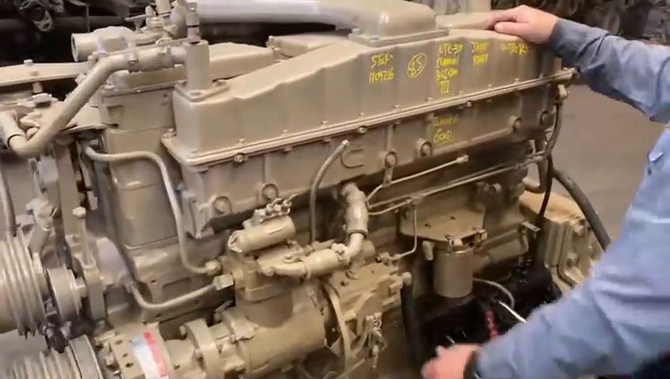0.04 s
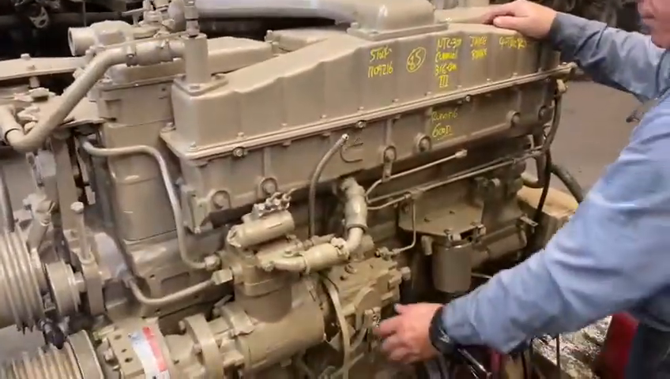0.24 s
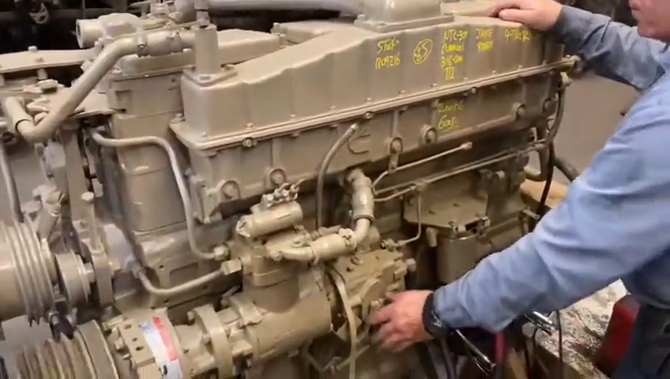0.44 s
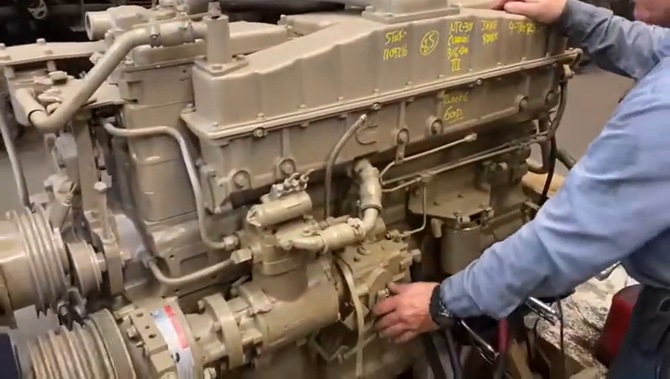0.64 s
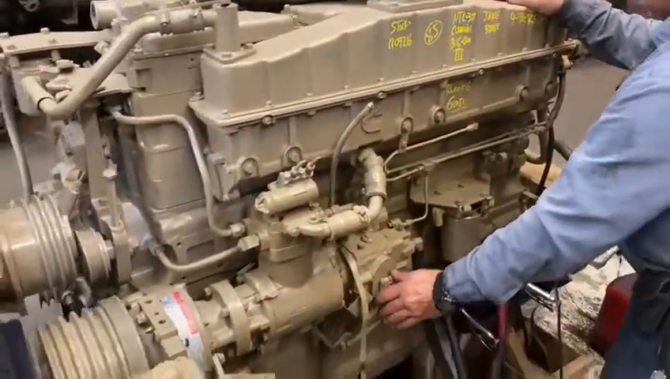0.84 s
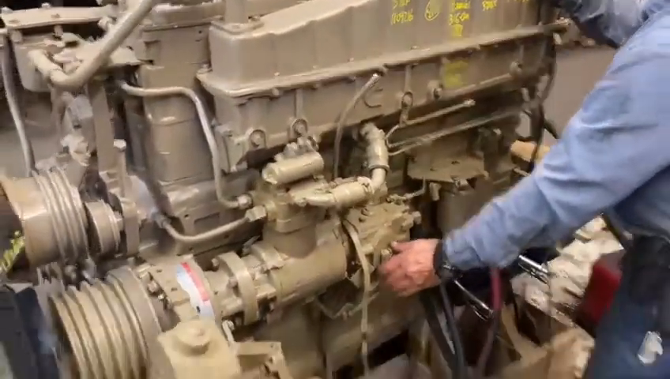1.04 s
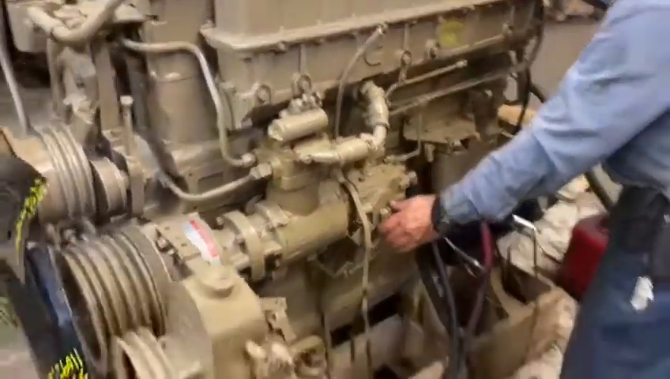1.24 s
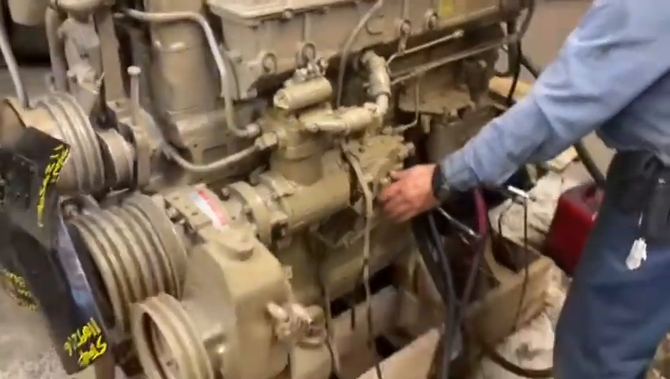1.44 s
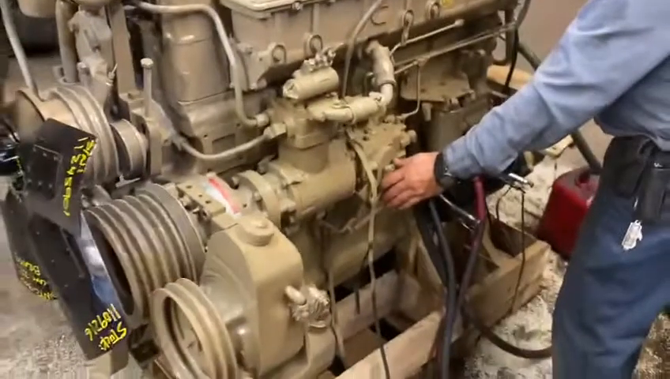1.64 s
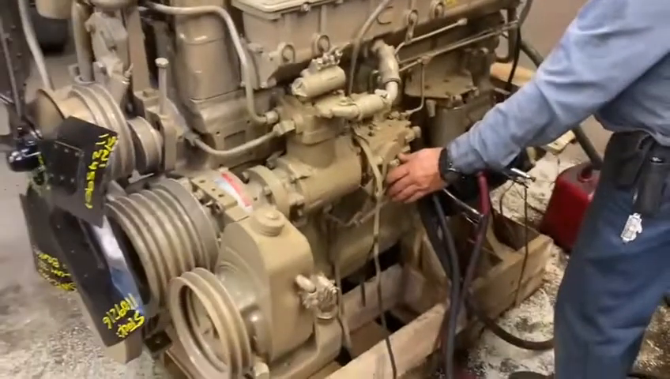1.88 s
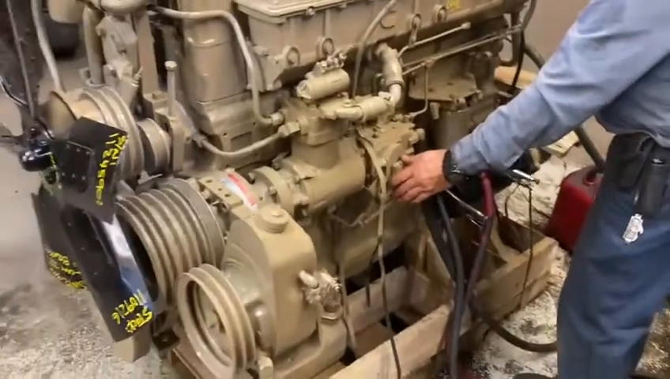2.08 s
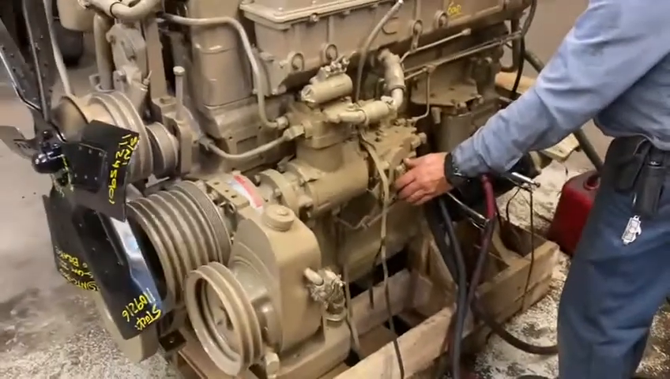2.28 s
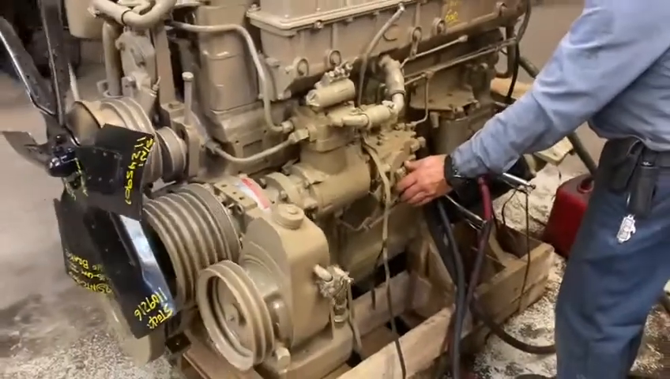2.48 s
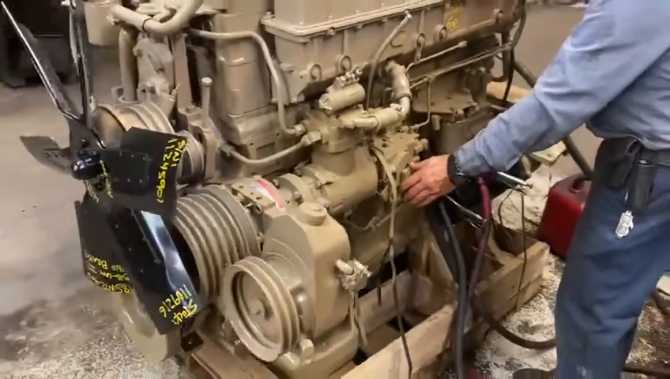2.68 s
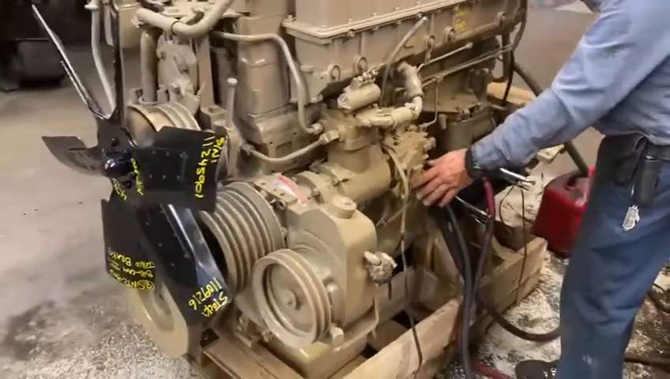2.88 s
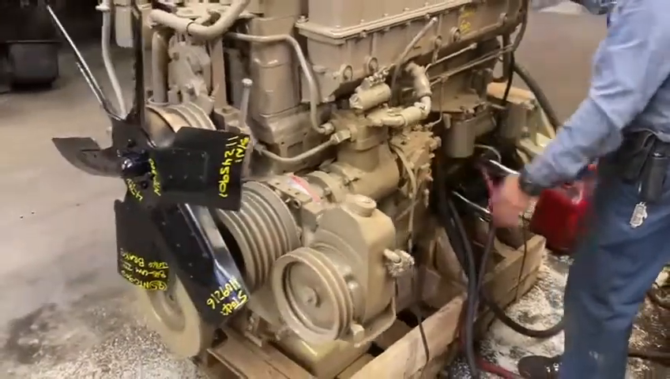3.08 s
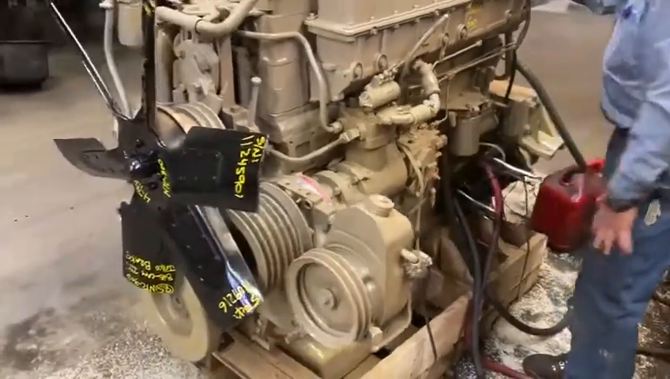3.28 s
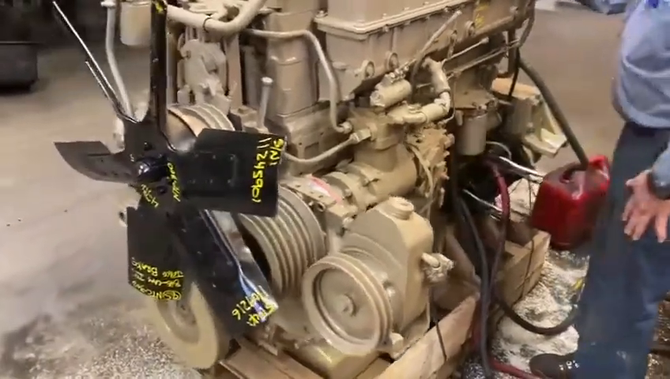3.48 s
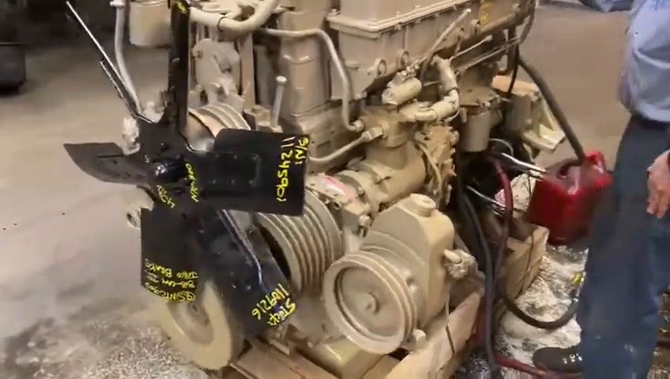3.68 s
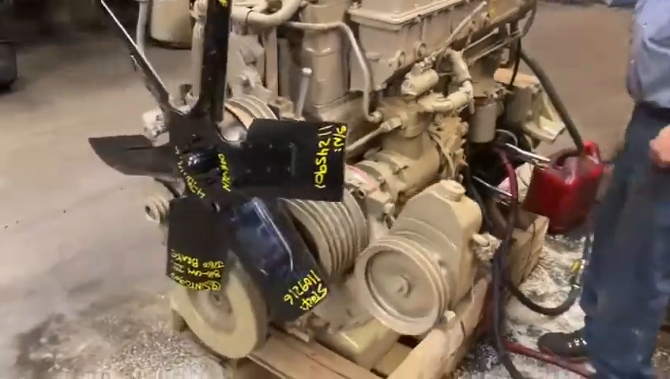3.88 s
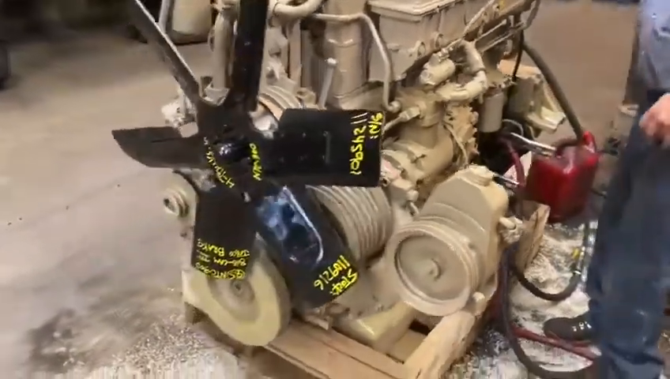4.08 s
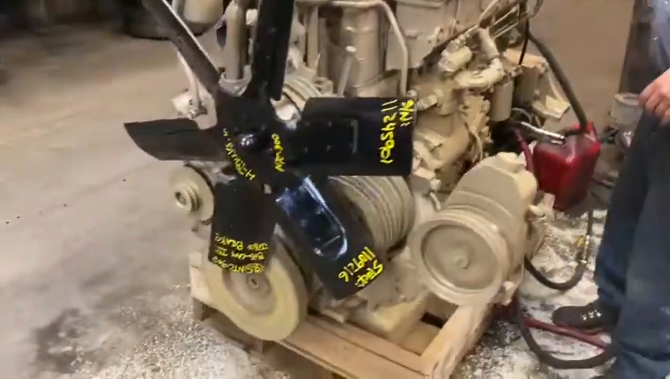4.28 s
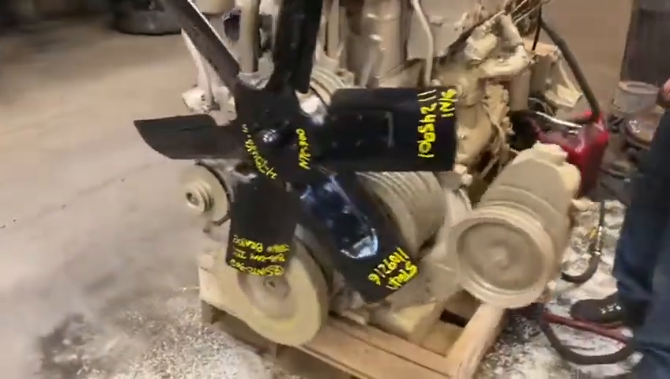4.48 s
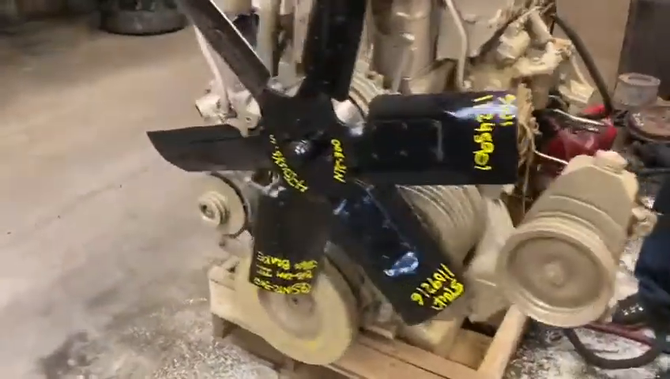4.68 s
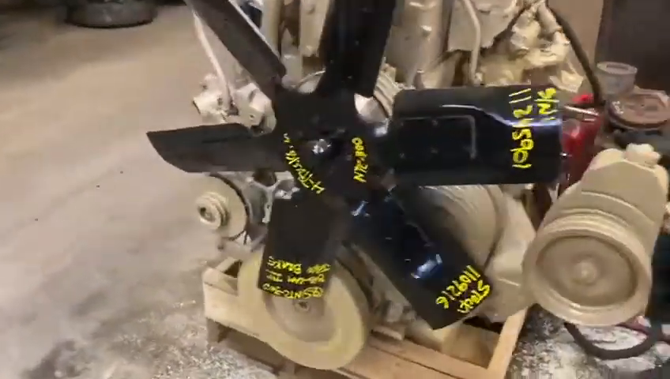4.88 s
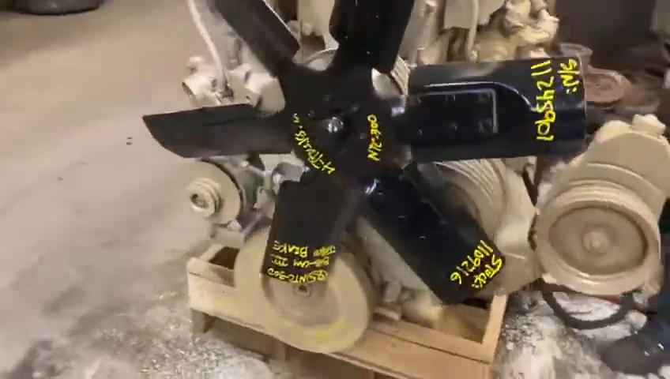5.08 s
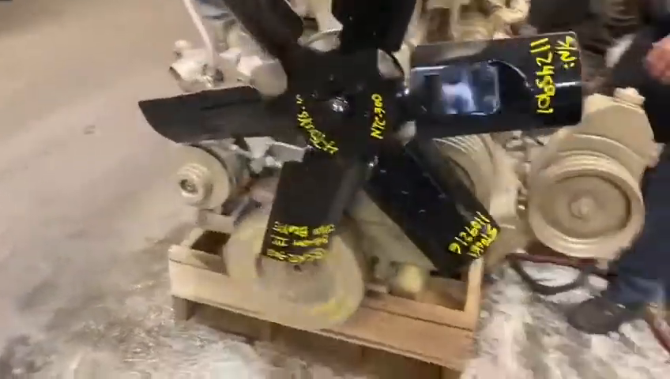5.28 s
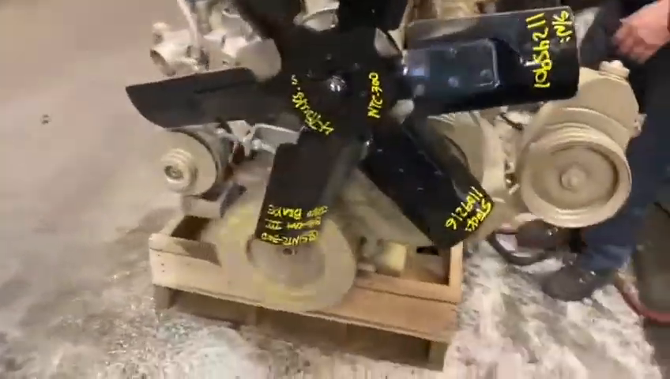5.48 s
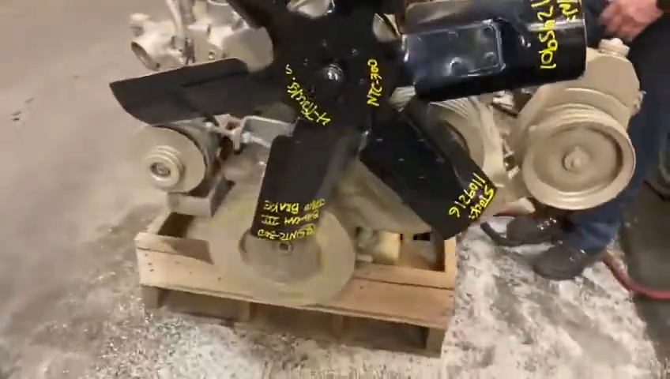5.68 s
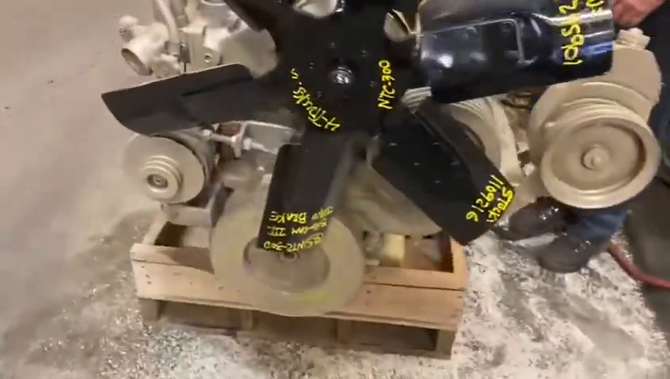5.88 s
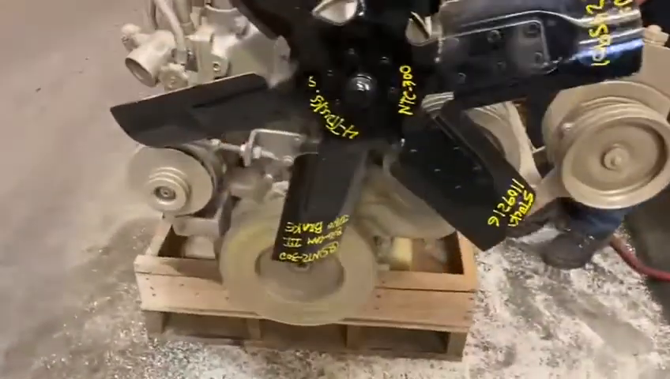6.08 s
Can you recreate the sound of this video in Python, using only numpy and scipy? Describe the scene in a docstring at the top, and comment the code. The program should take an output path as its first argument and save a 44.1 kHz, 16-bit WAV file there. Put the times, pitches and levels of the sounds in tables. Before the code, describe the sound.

Close beside a clattering six-cylinder diesel: puffing idle, two booming hand revs, whistling turbo, a knocking slowdown below idle, then a hard recovery.

```python
"""Air puffs once a revolution over the knock and exhaust rumble of an idling six-cylinder turbo diesel.
The engine stands bare on a pallet in a workshop; its compressor blows into the open, close by.
Two revs by hand bring exhaust boom, hard clatter and a rising turbo whistle; it coasts below idle, gears
knocking, until the governor's fuel catches it. Crank-timed bursts of coloured noise make the blows and
puffs, sines the exhaust tones, randomly modulated carriers the whistle."""
import sys
import numpy as np
from scipy import signal
from scipy.fft import rfft, irfft, next_fast_len
from scipy.io import wavfile
from scipy.ndimage import uniform_filter1d, map_coordinates

SR = 44100
rng = np.random.default_rng(int(sys.argv[2]) if len(sys.argv) > 2 else 0)


def generate_wav(sig):
    """Save sig (samples, or channels by samples) to the path in sys.argv[1] as 16-bit PCM at SR."""
    pcm = np.round(np.clip(np.atleast_2d(sig).T, -1, 1) * 32767).astype(np.int16)
    wavfile.write(sys.argv[1], SR, pcm)


N = 270325
IDLE_RPS = 11.2

# cylinder strengths in firing order: strength_db
CYLINDER_DB = [0.078, 0.021, -0.23, 0.66, 1, 0.74]
# microphone path round the engine: time_s, position (0 compressor side, 1 in front of the fan)
MIC_WALK = [(0, 0.0056), (2.7, 0.038), (3.7, 0.16), (4.5, 0.69), (5.5, 1), (6.13, 1)]
# block colour, relative: freq_hz, density_db (per Hz)
BLOCK_SPECTRUM = [(150, -64), (400, -1.5), (520, -3), (700, -1.5), (860, -1.5), (1100, -4), (1350, -4),
                  (1650, -6), (2100, -12), (3000, -19), (5000, -20.5), (11000, -29)]


def amp(db):
    """Decibels to gain."""
    return 10 ** (np.asarray(db) / 20)


def unit(x):
    """Scaled to rms 1."""
    return x / np.sqrt(np.mean(x ** 2) + 1e-20)


def along(points, hz):
    """(Hz, value) points read on a log axis."""
    f, v = np.transpose(points)
    return np.interp(np.log(hz + 1), np.log(f + 1), v)


def curves(rows):
    """One value per sample for each column after the time."""
    s, *cols = np.transpose(rows)
    return [np.interp(np.arange(N) / SR, s, c) for c in cols]


def wobble(rate):
    """A smooth random curve, rate knots a second."""
    knots = rng.standard_normal(int(N * rate / SR) + 4)
    return map_coordinates(knots, [np.arange(N) * rate / SR])


def noise():
    """Two unrelated white noises."""
    return rng.standard_normal((2, N))


def filtered(x, response):
    """x times a complex response of frequency."""
    m = next_fast_len(N + SR // 2)
    return irfft(rfft(x, m) * response(np.fft.rfftfreq(m, 1 / SR)), m)[..., :N]


def lift(modes, hz):
    """dB by which resonances raise a frequency."""
    return sum(db / (1 + (2 * (hz - centre) / width) ** 2) for centre, width, db in modes)


def radiate(pair, spectrum, modes=()):
    """Two unrelated signals become a coloured, resonant, partly alike stereo pair of rms 1."""
    # left-right likeness: freq_hz, correlation
    likeness = [(100, 0.98), (300, 0.99), (550, 1), (1000, 0.38), (2000, 0.61), (4000, 0.43), (8000, 1),
                (11000, 1)]

    def response(hz):
        turn = np.arccos(np.clip(along(likeness, hz), -1, 1)) / 2
        return amp(along(spectrum, hz) + lift(modes, hz)) * [np.cos(turn), np.sin(turn)]

    mid, side = filtered(pair, response)
    return unit(np.array([mid + side, mid - side]))


def struck(rows, ring_s):
    """Envelope of (s, dB) blows that each fall 60 dB in ring_s."""
    t = np.arange(N) / SR
    return sum((t >= s) * amp(db - 60 * np.abs(t - s) / ring_s) for s, db in rows)


def crackle(rate, life_s, size_db):
    """Noise in random grains, rate a second, that start sharply and fall 60 dB in life_s."""
    grains = (rng.random(N) < rate / SR) * amp(size_db * np.clip(rng.standard_normal(N), -2, 2))
    decay = amp(-60 * np.arange(SR // 16) / SR / life_s)
    energy = np.abs(signal.fftconvolve(grains ** 2, decay ** 2)[:N])
    return unit(noise() * np.sqrt(energy))


def firings(turns, ring_s, scatter_db, rough):
    """Three blows per unit of turns ring partly alike and partly as fresh noise (share rough)."""
    at = np.flatnonzero(np.diff(np.floor(turns * len(CYLINDER_DB) / 2)))
    blow_db = np.resize(CYLINDER_DB, len(at)) + rng.uniform(-scatter_db, scatter_db, len(at))
    blows = np.zeros(N)
    blows[at] = amp(blow_db) * np.sqrt(np.gradient(at))  # equal power at any speed
    decay = amp(-60 * np.arange(SR // 4) / SR / ring_s)
    impulse = decay * rng.standard_normal((2, len(decay)))
    ring = signal.fftconvolve(blows[None], impulse, axes=1)[:, :N]
    gated = noise() * np.sqrt(np.abs(signal.fftconvolve(blows ** 2, decay ** 2)[:N]))
    share = np.clip(rough, 0, 1)
    return np.sqrt(1 - share) * unit(ring) + np.sqrt(share) * unit(gated)


def patchy(x, depth_db, bins, frames=8):
    """The colour shifts at random over time and frequency."""
    z = signal.stft(x, nperseg=512)[2]
    field = uniform_filter1d(rng.standard_normal(z.shape[1:]), bins, 0)
    field = uniform_filter1d(field, frames, 1)
    return unit(signal.istft(z * amp(depth_db * unit(field)), nperseg=512)[1][:, :N])


def block(pair, spectrum):
    """The block's resonances stand out or recede as the microphone moves round it."""
    # listening point: time_s, station (0 close beside, 1 a step back, 2 in front of the fan)
    stations = [(0, 0), (.95, 0), (1.35, 1), (3.1, 1), (4.6, 2), (6.13, 2)]
    # block and covers: freq_hz, width_hz, beside_lift_db, step_back_lift_db, fan_lift_db
    modes = np.array([(528, 42, 9, 3.5, -4), (703, 140, 6, 8.5, 5.5), (802, 75, 1.5, 0.5, 0.5),
                      (1080, 260, 2, 5, 0.5), (1250, 100, -5, 0.5, -1.5), (1613, 210, 6.5, 7.5, 5.5),
                      (2100, 61, 8, 5, 6.5), (2470, 360, -4, -10, 9.5)])
    station, = curves(stations)
    heard = 0
    for k, lifts in enumerate(modes[:, 2:].T):
        weight = np.clip(1 - np.abs(station - k), 0, 1)
        heard = heard + weight * radiate(pair, spectrum, np.column_stack([modes[:, :2], lifts]))
    return heard


def level(law, speed, load):
    """A source's dB from engine speed, load and where the microphone stands."""
    idle_db, speed_db, load_db, front_db = law
    front, = curves(MIC_WALK)
    return idle_db + speed_db * np.log2(speed / IDLE_RPS) + load_db * load + front_db * front


def fuel():
    """Fuel delivery 0-1: every spell ramps up, holds and ramps down."""
    # idle, two hand revs, governor's catch: opens_s, ramp_up_s, closes_s, ramp_down_s, strength (0-1)
    doses = [(-1, .3, 1.3, .4, .5), (1, .36, 1.62, .62, .98), (1.93, .64, 2.8, .3, .9),
             (5.57, .28, 6.3, .4, .62)]
    t = np.arange(N) / SR
    spells = []
    for opens, up_s, closes, down_s, strength in doses:
        ramps = np.minimum((t - opens) / up_s, 1 - (t - closes) / down_s)
        spells.append(strength * np.clip(ramps, 0, 1))
    return np.max(spells, axis=0)


def shop(x):
    """The workshop's reverberant tail is decaying noise, treble dying first."""
    # reverberation: freq_hz, t60_s
    decay_times = [(100, 0.37), (1000, 0.38), (4000, 0.16), (11000, 0.019)]
    hz, t, z = signal.stft(rng.standard_normal((2, SR // 2)), SR, nperseg=256)
    fading = z * amp(-60 * t / along(decay_times, hz)[:, None])
    tail = signal.istft(fading, SR, nperseg=256)[1]
    return signal.fftconvolve(x, tail / np.linalg.norm(tail[0]), axes=1)[:, :N]


def hum(hz=60.4, db=-53, front_db=8.5):
    """A faint, slightly unsteady mains sine, louder in front of the fan."""
    front, = curves(MIC_WALK)
    gain = amp(db + front_db * front + 1.5 * wobble(3.7))
    return gain * np.sqrt(2) * np.sin(2 * np.pi * hz * np.arange(N) / SR)


def buffet(at_s=1.605, sigma_s=0.015, db=-19):
    """A gust of moving air thumps the microphone: a short swell of low noise."""
    swell = np.exp(-.5 * ((np.arange(N) / SR - at_s) / sigma_s) ** 2)
    return amp(db) * swell * radiate(noise(), [(5, -11), (20, -4), (45, -4), (90, -2), (400, -84)])


def gears(load, rattle_db=-41, front_db=-3, ring_s=0.15):
    """Unloaded gears rattle across their slack, with a few heavier knocks on the cover."""
    # heavy knocks: time_s, level_db
    slack_knocks = [(.998, -29), (3.133, -19.5), (3.357, -26), (3.504, -25), (3.69, -24.5), (3.944, -26),
                    (4.061, -25.5), (4.245, -30), (4.5, -43), (4.85, -33), (4.95, -29.5)]
    # cover colour, relative: freq_hz, density_db (per Hz)
    cover = [(120, -22), (280, -2), (450, -4.5), (800, -14), (1700, -16), (2500, -19), (8000, -42)]
    # cover resonances: freq_hz, width_hz, lift_db
    cover_modes = [(332, 28, 8), (804, 50, 5), (1200, 49, 5)]
    front, = curves(MIC_WALK)
    grains = crackle(rate=28, life_s=0.092, size_db=0.5)
    rattle = amp(rattle_db + front_db * front) * (1 - load) * grains
    knocks = struck(slack_knocks, ring_s) * radiate(noise(), cover, cover_modes)
    return knocks + np.std(rattle) * block(rattle, BLOCK_SPECTRUM)


def hard_knocks(ring_s=.12):
    """A sudden dose of fuel in a slow engine fires hard and rings the block."""
    # single combustions: time_s, level_db
    blows = [(5.808, -32), (5.833, -28), (5.992, -24.5), (6.048, -36), (6.071, -20.5)]
    # block under a hard blow, relative: freq_hz, density_db (per Hz)
    hard_spectrum = [(150, -32), (350, 0), (750, 2), (1200, 1), (1700, -4), (2200, -37), (6000, -19),
                     (11000, -36)]
    return struck(blows, ring_s) * block(noise(), hard_spectrum)


def clatter(speed, load, idle_speed_db=-27, speed_db=-9):
    """A full dose of fuel burns abruptly and rattles the engine, worst while it is still slow."""
    # clatter colour, relative: freq_hz, density_db (per Hz)
    sharp_spectrum = [(600, -20), (1100, 16), (1900, -3), (2600, -12), (3500, 3), (4400, -13), (5500, 1),
                      (8000, -2), (10000, -3), (12000, -14)]
    overfuel = np.interp(load, [.6, .96], [0, 1])
    gain = amp(idle_speed_db + speed_db * np.log2(speed / IDLE_RPS))
    return gain * overfuel * radiate(crackle(rate=260, life_s=0.035, size_db=2.0), sharp_spectrum)


def turbo(speed, turns, load, waver=0.00508, spread_hz=190, flutter_db=1.5, hiss_power=6.25,
          halo_db=-7.0, halo_hz=330, octave_hz=260, core=.5):
    """The wheel whistles at its shaft speed, smeared by turbulence, over the grainy hiss of its intake."""
    # whistle pitch: time_s, pitch_hz
    pitch = [(0, 1555), (1.1, 1540), (1.4, 1683), (1.55, 1978), (1.76, 2550), (1.9, 2710), (2.3, 2914),
             (2.6, 3504), (2.7, 4030), (2.9, 4660), (3.2, 4840), (3.5, 4880), (4, 4575), (4.5, 4084),
             (5, 3410), (5.5, 2740), (5.85, 2490), (6.13, 2460)]
    # whistle, surging on spool-up and when fuel returns: time_s, level_db
    whistle_level = [(0, -37), (1.15, -34.5), (1.41, -22.5), (1.49, -35), (1.56, -26), (1.68, -36),
                     (1.74, -25.5), (1.8, -27.5), (1.95, -31.5), (2.2, -33.5), (2.54, -27), (2.65, -30.5),
                     (2.8, -27.5), (2.97, -34.5), (3.12, -31.5), (3.6, -32), (3.72, -36.5), (3.95, -32.5),
                     (4.35, -34), (4.55, -38), (4.75, -42), (4.95, -38.5), (5.35, -45), (5.52, -41),
                     (5.61, -52), (5.71, -40), (5.77, -42), (5.88, -34), (6.13, -28.5)]
    # its octave: time_s, level_db
    octave_level = [(0, -44), (1.2, -43.5), (1.42, -29.5), (1.6, -39), (2.2, -45), (2.55, -48), (3.3, -42),
                    (3.8, -41), (4.3, -63), (4.8, -59), (5.3, -59), (5.62, -61), (5.69, -52), (5.85, -45),
                    (6.13, -46)]
    # intake hiss, relative: freq_hz, density_db (per Hz)
    intake = [(800, 1), (1750, -5.5), (2300, -0.5), (3000, -1), (4200, -2.5), (5500, -4.5), (7500, -9),
              (10000, -7), (12000, -19)]
    # hiss: idle_no_fuel_db, db_per_speed_doubling, full_fuel_added_db, fan_side_added_db
    hiss_law = (-40.5, 9.5, 9, -1.5)
    hz, = curves(pitch)
    phase = 2 * np.pi * np.cumsum(hz * (1 + waver * wobble(60))) / SR

    def eddies(rate):
        return wobble(rate) + 1j * wobble(rate)

    def band(width_hz, order):
        return unit(np.real(eddies(width_hz) * np.exp(1j * order * phase)))

    # hoarser with engine pull and wheel speed
    hoarse = np.interp(load * speed, [0, 9, 17], [.2, .25, .75]) + np.interp(hz, [3000, 4900], [0, .25])

    def voice():
        skirt = core + .5 * eddies(spread_hz) + hoarse * eddies(4 * spread_hz)
        return np.real(skirt * np.exp(1j * phase)) / np.hypot(1, hoarse)

    # exhaust pulses reach the wheel one by one and make it flutter
    pulsing = np.sin(2 * np.pi * turns * len(CYLINDER_DB) / 2)
    shimmer_db = .4 * wobble(14) + 1.3 * wobble(55)
    flutter = amp(shimmer_db + flutter_db * (pulsing + wobble(35)))
    whistle = unit(np.array([voice(), voice()]) * flutter)
    # wall reflections: a broader, airy halo of opposite sign left and right
    halo = amp(halo_db) * np.array([[1], [-1]]) * band(halo_hz, order=1)

    # the octave widens into a breathy band as the wheel speeds up
    wide = np.interp(hz, [2700, 4200], [0, .9])

    def overtone():
        return np.sqrt(1 - wide) * band(octave_hz, order=2) + np.sqrt(wide) * band(4 * octave_hz, order=2)

    octave = amp(curves(octave_level)[0]) * np.array([overtone(), overtone()])
    hiss_gain = amp(level(hiss_law, speed, load ** hiss_power))
    hiss = hiss_gain * radiate(crackle(rate=800, life_s=0.096, size_db=2.5), intake)
    return amp(curves(whistle_level)[0]) * unit(whistle + halo) + octave + hiss


def exhaust(speed, turns, load, roar_db=-21):
    """Gas pulses rumble and boom in the open pipe; higher orders swell as they cross its resonances."""
    # pipe colour, relative: freq_hz, density_db (per Hz)
    pipe = [(20, -24), (45, -14), (65, 1), (105, -3), (155, -3), (210, -4.5), (290, 4.5), (380, -0.5),
            (460, -2.5), (800, -12.5), (1600, -15), (4000, -30)]
    # pipe resonances: freq_hz, width_hz, lift_db
    pipe_modes = [(208.5, 25, 8), (253, 30, 3), (364, 11, 5.5)]
    # roar colour, relative: freq_hz, density_db (per Hz)
    roar_spectrum = [(70, -25), (140, -7), (230, -4), (360, -1), (420, -20), (600, -16), (1000, -27),
                     (3000, -60)]
    # rumble: idle_no_fuel_db, db_per_speed_doubling, full_fuel_added_db, fan_side_added_db
    rumble_law = (-35, 2, 11, -1.5)
    # firing tone (three cycles a revolution), its 2nd and 3rd harmonics: time_s, level_db
    first = [(0, -47), (1.15, -39), (1.3, -28), (1.42, -25), (1.5, -24), (1.58, -20.5), (1.95, -27.5),
             (2.2, -29), (2.42, -23.5), (2.52, -29), (2.58, -31), (2.66, -22), (2.83, -18), (3.1, -26),
             (3.45, -40), (3.6, -62), (5.75, -65), (6.13, -37)]
    second = [(0, -40), (1.2, -40), (1.38, -22), (1.52, -21), (1.63, -31), (1.75, -27.5), (2, -30),
              (2.12, -39), (2.25, -33), (2.451, -23.5), (2.56, -33), (2.69, -19.5), (2.829, -45), (3, -36),
              (3.4, -48), (5.55, -47), (5.75, -35), (6.13, -43)]
    third = [(0, -36), (1.1, -32.5), (1.25, -38), (2.35, -51), (2.52, -21), (2.6, -27.5), (2.77, -26),
             (2.95, -39), (3.1, -34.5), (3.65, -35), (4.001, -48), (5.6, -59), (5.85, -32.5), (6.13, -47)]
    # weaker tones: crank_multiple, level_db (against the rumble, before speed and resonance)
    weak_orders = [(4.5, -11.5), (5, -17), (7, -13.5), (8, -17), (10, -19), (12, -18), (13, -15.5),
                   (15, -14), (18, -21.5)]

    def tone(order, db):
        return amp(db) * np.sqrt(2) * np.sin(2 * np.pi * (order * turns + rng.random()))

    rumble_db = level(rumble_law, speed, load)
    pulses = firings(turns, ring_s=0.73, scatter_db=2.85, rough=0.93)
    rumble = amp(rumble_db) * radiate(pulses, pipe, pipe_modes)
    boom = sum(tone(k * len(CYLINDER_DB) / 2, curves(rows)[0] + .5 * k * wobble(17))
               for k, rows in enumerate([first, second, third], 1))
    # the weaker orders are held back near idle
    overtone_db = rumble_db + np.interp(speed, [12, 18], [-6, 0])
    overtones = sum(tone(order, overtone_db + db + lift(pipe_modes, order * speed) + 2 * wobble(6.5))
                    for order, db in weak_orders)
    # fuel at high speed makes the pipe roar
    pull = load * np.interp(speed, [21, 26], [0, 1])
    blasts = firings(turns, ring_s=0.07, scatter_db=4.75, rough=0.48)
    roar = amp(roar_db) * pull * radiate(blasts, roar_spectrum, pipe_modes)
    return rumble + boom + overtones + roar


def knock(speed, turns, load):
    """Combustions rap the iron block; injectors and valves tick in between, softer when turning slowly."""
    # knock: idle_no_fuel_db, db_per_speed_doubling, full_fuel_added_db, fan_side_added_db
    knock_law = (-33.5, 2, 13, -6)
    raps = firings(turns + .1, ring_s=0.2, scatter_db=0.38, rough=0.76)
    # six ticks a revolution, unsteady in timing
    tick_turns = 2 * turns + .25 + .01 * wobble(60)
    ticks = firings(tick_turns, ring_s=0.016, scatter_db=2.85, rough=0.91)
    seating_db = np.interp(speed, [8, 12], [-11, -7.5])
    iron = block(raps + amp(seating_db) * ticks, BLOCK_SPECTRUM)
    return amp(level(knock_law, speed, load)) * patchy(iron, depth_db=1.33, bins=4)


def compressor(speed, turns, load, rise=0.088, fall=0.11, slow_db=-7, peakedness=2.01, spit_ring_s=0.024):
    """The piston spits one puff of air a revolution, earlier in the turn at speed, feebly below idle."""
    # outlet colour, relative: freq_hz, density_db (per Hz)
    outlet = [(350, -16), (520, 4), (750, -5), (1200, 7), (1900, 5.5), (2400, -0.5), (3200, 4.5), (4200, 3),
              (5000, -1), (6000, 2), (7500, -2), (10000, -1.5), (12000, -3.5)]
    # puff: idle_no_fuel_db, db_per_speed_doubling, full_fuel_added_db, fan_side_added_db
    puff_law = (-19, -2, 2, -14.5)
    # harder spits of the valve: time_s, level_db
    valve_spits = [(1.442, -26), (1.795, -17.5), (1.847, -20), (2.287, -27), (2.517, -24)]
    puff_db = level(puff_law, speed, load) + np.interp(speed, [7.5, IDLE_RPS], [slow_db, 0])
    lead_turns = np.interp(speed, [12, 20, 29], [.02, .46, .6])
    # at speed the puffs grow more ragged and fill more of the turn
    ragged = np.interp(speed, [11, 25], [.4, 1])
    spread = np.interp(speed, [12, 25], [1, 1.35])
    stroke = (turns + lead_turns + .05 * ragged * wobble(70) + .5) % 1 - .5
    flank = spread * np.where(stroke < 0, rise, fall)
    flow = np.exp(-.5 * np.abs(stroke / flank) ** peakedness)
    uneven_db = 0.96 * ragged * wobble(24.93)
    air = radiate(crackle(rate=2200, life_s=0.025, size_db=3.0), outlet)
    return (amp(puff_db + uneven_db) * flow + struck(valve_spits, spit_ring_s)) * air


def scene():
    """Crank speed and fuel drive the engine's sources; all but the exhaust also excite the workshop."""
    # crankshaft: time_s, speed_rps
    crank = [(0, 11.14), (.9, 11.16), (1.22, 11.48), (1.55, 17.14), (1.66, 20.92), (1.8, 20.51),
             (2.38, 20.12), (2.75, 27.59), (3, 29.17), (3.25, 27.6), (4, 20.18), (4.6, 15.11), (5.3, 8.72),
             (5.55, 7.5), (5.7, 7.81), (6.13, 13.3)]
    speed, = curves(crank)
    turns = np.cumsum(speed) / SR - .78
    load = fuel()
    iron = gears(load) + hard_knocks() + clatter(speed, load) + knock(speed, turns, load)
    machine = iron + turbo(speed, turns, load) + compressor(speed, turns, load)
    return hum() + buffet() + amp(-12.0) * shop(machine) + exhaust(speed, turns, load) + machine


def record(dry, top_hz=12400):
    """Stereo output: the two channels turn in and out of phase in the high treble."""
    # microphone response: freq_hz, gain_db
    mic_response = [(20, 0), (10900, 0), (11600, -2), (12000, -10), (12400, -24)]
    # balance: freq_hz, left_minus_right_db
    balance = [(60, -0.5), (130, -4.5), (270, -1.5), (580, -4.5), (1220, 0), (2600, -0.5), (5520, 1),
               (11700, -0.5)]
    # left channel's phase lead: freq_hz, lead_half_turns
    phase_lead = [(100, 0), (860, .12), (2150, 0), (3000, .15), (4100, 0), (4800, .12), (7000, 0),
                  (7600, -.2), (8150, -.9), (8700, -1.1), (9500, -1.9), (10750, -2.1), (11400, -2.9),
                  (12400, -3)]
    sides = np.array([[.5], [-.5]])

    def channels(hz):
        gain = amp(along(mic_response, hz) + sides * along(balance, hz))
        return gain * np.exp(1j * np.pi * sides * along(phase_lead, hz)) * (hz < top_hz)

    return filtered(dry, channels)


dry = scene()
out = record(dry)
generate_wav(out)
```